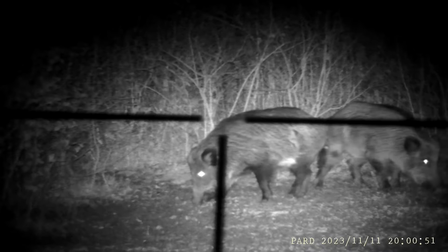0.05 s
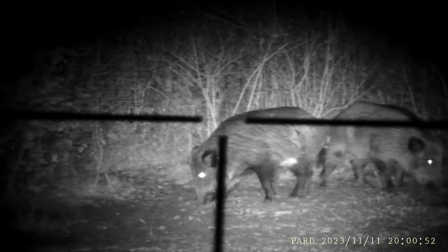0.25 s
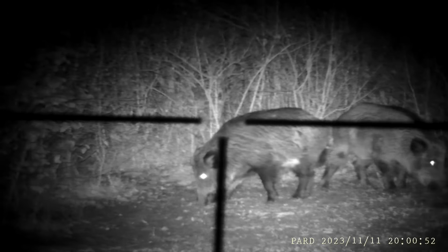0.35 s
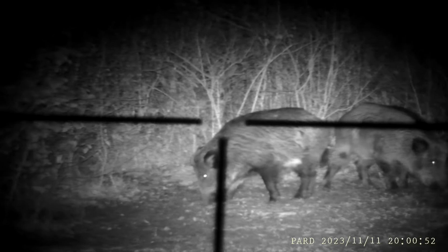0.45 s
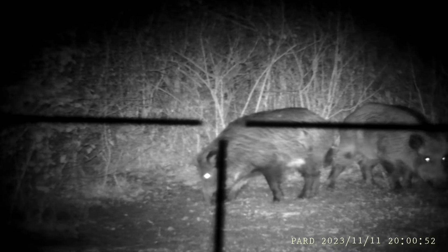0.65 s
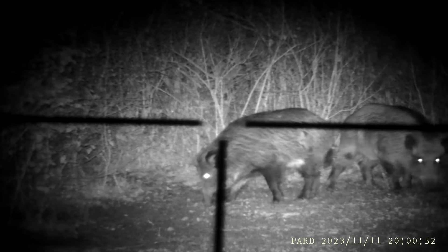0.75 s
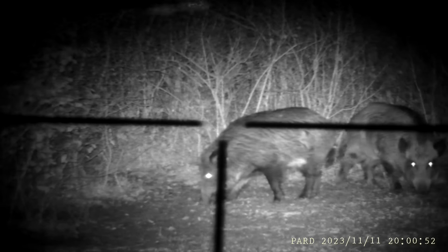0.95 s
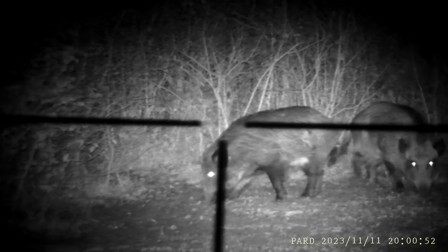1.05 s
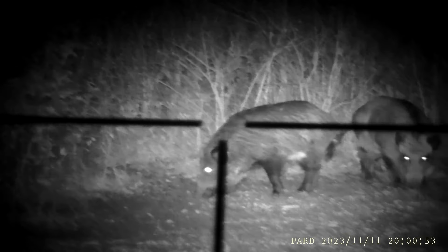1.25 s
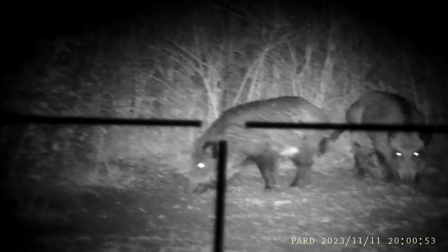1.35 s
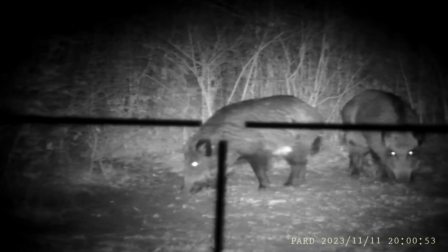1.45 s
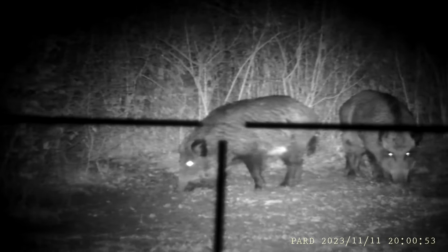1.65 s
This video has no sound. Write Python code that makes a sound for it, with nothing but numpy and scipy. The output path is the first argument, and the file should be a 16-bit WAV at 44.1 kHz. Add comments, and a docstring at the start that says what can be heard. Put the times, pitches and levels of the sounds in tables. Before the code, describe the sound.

Fingers shift on a small device close to its microphone, making a dull knock, light rubbing and tiny ticks. Then a button snaps sharply once, echoing faintly over a quiet outdoor night hiss.

```python
"""A button on a small hand-held device snaps once, sharply, right at its built-in microphone.
Its contacts ring the housing and give the body a low push; the outdoor surroundings return a faint echo.
Around the snap the grip shifts: skin rustles and sways the housing, dull bumps press on the body,
small parts tick faintly. A low steady night hiss lies underneath."""
import sys
import numpy as np
from scipy import signal
from scipy.fft import rfft, irfft
from scipy.io import wavfile

SR = 44100
rng = np.random.default_rng(int(sys.argv[2]) if len(sys.argv) > 2 else 0)


def bounce(signal):
    """Save signal as a 16-bit WAV file at the path given by the first command-line argument."""
    frames = np.transpose(np.atleast_2d(signal))
    limited = np.clip(frames, -1, 1)
    pcm = np.round(limited * 32767).astype(np.int16)
    wavfile.write(sys.argv[1], SR, pcm)


N = 74970

# steady hiss spectrum (frequency [Hz], relative density [dB])
HISS_SPECTRUM = [(15, -34), (25, -5), (91, -2.5), (113, -2), (188, -2.5), (233, -4), (266, -3), (443, -5),
                 (1610, -14.5), (2830, -20.5), (15400, -33)]
# skin rustle spectrum (frequency [Hz], relative density [dB])
RUSTLE_SPECTRUM = [(60, 2.5), (300, 3.5), (1000, 0.5), (2000, -7), (3500, -13), (5000, -15.5),
                   (8000, -21.5), (15000, -23)]
# skin rustle envelope (time [s], level [dB])
RUSTLE_ENVELOPE = [(0, -84), (.18, -68.5), (.27, -62.5), (.37, -61), (.5, -61.5), (.57, -67.5),
                   (.66, -64.5), (.8, -67.5), (.95, -64.5), (1.12, -74.5), (1.7, -93)]
# handling rumble spectrum (frequency [Hz], relative density [dB])
RUMBLE_SPECTRUM = [(6, 2.5), (14, -3.5), (35, -24), (100, -27), (200, -37), (500, -60.5)]
# handling rumble envelope (time [s], level [dB])
RUMBLE_ENVELOPE = [(0, -58), (.15, -53.5), (.25, -43.5), (.42, -46), (.52, -56.5), (.65, -58), (.74, -58.5),
                   (.87, -59), (1.05, -69.5), (1.7, -72)]
# bumps on the body (time [s], level [dB], half width [s])
BUMP_PULSES = [(.112, -44.5, .001), (0.2683, -39, 0.003), (.2948, -19.5, 0.0019), (0.3618, -43.5, 0.00083),
               (0.658, -43.5, 0.001), (0.8915, -50, .003)]
# ticks under the grip (time [s], level [dB], body re edge [dB])
TICK_EVENTS = [(0.2674, -49.5, -19), (0.358, -41.5, -2), (0.5273, -45, -12), (.6138, -48.5, -14),
               (0.745, -54.5, -12)]
# bright edge of a tick (frequency [Hz], level [dB], T60 [s])
TICK_EDGE_MODES = [(5090, 0, 0.0031), (7200, -10.5, 0.0036)]
# lower body of a tick (frequency [Hz], level [dB], T60 [s])
TICK_BODY_MODES = [(2720, 0, 0.0037)]
# echo spectrum (frequency [Hz], relative density [dB])
ECHO_SPECTRUM = [(300, -5), (800, 5), (1250, 8.5), (1900, -7), (2600, 1.5), (3600, -12), (4700, 3.5),
                 (5700, -3.5), (7500, -14), (11000, -27)]
# housing resonances (frequency [Hz], level [dB], T60 [s])
HOUSING_MODES = [(1312, -25.5, 0.038), (1506, -14, 0.01), (2060, -28, 0.022), (2594, -13.5, 0.0097),
                 (3550, -20.5, 0.011), (4705, -5.5, 0.0061), (5170, -20, .016), (5550, -0.5, 0.0038),
                 (6270, -5, 0.0013), (8080, -14, 0.008)]
# button contacts, snapping over and settling (time [s], level [dB])
SNAP_CONTACTS = [(.88406, -22), (.88523, -56), (.88666, -37.5)]

TIME_S = np.arange(N) / SR
SINCE_SNAP_S = np.maximum(TIME_S - SNAP_CONTACTS[0][0], 0)


def amp(db):
    """Decibels to gain."""
    return 10 ** (np.asarray(db) / 20)


def add(mix, start_s, sound):
    """Mixes a sound in at start_s."""
    part = mix[round(start_s * SR):][:len(sound)]
    part += sound[:len(part)]


def envelope(points):
    """Gain curve from (time [s], level [dB]) points."""
    return amp(np.interp(TIME_S, *np.transpose(points)))


def noise(spectrum):
    """Unit-rms noise with the given spectrum."""
    hz, db = np.transpose(spectrum)
    bins_hz = np.fft.rfftfreq(N, 1 / SR)
    gain = amp(np.interp(np.log(bins_hz + 1), np.log(hz), db)) * (bins_hz > 0)
    shaped = irfft(rfft(rng.standard_normal(N)) * gain, N)
    return shaped / shaped.std()


def ring(modes, rise_s=0.00008, length_s=0.04):
    """Damped modes excited by one contact."""
    t = np.arange(0, length_s, 1 / SR)
    ringing = sum(amp(db - 60 * t / t60_s) * np.sin(2 * np.pi * hz * t) for hz, db, t60_s in modes)
    return ringing * (1 - np.exp(-t / rise_s))


def hiss(level_db=-65.5):
    """Low steady background noise."""
    return amp(level_db) * noise(HISS_SPECTRUM)


def hand():
    """Skin rubs on the housing and sways it."""
    rustle = noise(RUSTLE_SPECTRUM) * envelope(RUSTLE_ENVELOPE)
    rumble = noise(RUMBLE_SPECTRUM) * envelope(RUMBLE_ENVELOPE)
    return rustle + rumble


def bumps(roundness=0.5, mic_low_cut_hz=7.2):
    """Rounded pressure pulses; the microphone's low cut makes each swing back slowly."""
    pressure = np.zeros(N)
    for peak_s, db, half_width_s in BUMP_PULSES:
        offset = (TIME_S - peak_s) / half_width_s
        pressure += amp(db) * np.exp(roundness - np.hypot(offset, roundness))
    return -signal.lfilter(*signal.butter(2, mic_low_cut_hz, "high", fs=SR), pressure)


def ticks():
    """Small parts shift under the grip, some with more body than others."""
    out = np.zeros(N)
    for start_s, db, body_db in TICK_EVENTS:
        tick = ring(TICK_EDGE_MODES) - amp(body_db) * ring(TICK_BODY_MODES)
        add(out, start_s, amp(db) * tick)
    return out


def echo(level_db=-54, rise_s=0.024, t60_s=0.35):
    """Diffuse return of the snap from the surroundings, as decaying noise."""
    rise = 1 - np.exp(-SINCE_SNAP_S / rise_s)
    decay = amp(level_db - 60 * SINCE_SNAP_S / t60_s)
    return noise(ECHO_SPECTRUM) * rise * decay


def button(snap_cutoff_hz=8200, push_db=-45, push_peak_s=0.0012):
    """Contacts ring the housing, the ring low-passed at about 8 kHz; the snap also pushes the body."""
    ringing = np.zeros(N)
    for start_s, db in SNAP_CONTACTS:
        add(ringing, start_s, amp(db) * ring(HOUSING_MODES))
    snap_lowpass = signal.butter(12, snap_cutoff_hz, fs=SR, output="sos")
    push = amp(push_db) * SINCE_SNAP_S / push_peak_s * np.exp(1 - SINCE_SNAP_S / push_peak_s)
    return signal.sosfilt(snap_lowpass, ringing) + push


def scene():
    """Hiss, handling, echo and button in mono."""
    return (hiss() + hand() + bumps() + ticks() + echo() + button())[None]


def record(dry, cutoff_hz=15550):
    """The device's band limit."""
    lowpass = signal.firwin(511, cutoff_hz, window=("kaiser", 9), fs=SR)
    return signal.oaconvolve(dry, lowpass[None], "same")


dry = scene()
out = record(dry)
bounce(out)
```